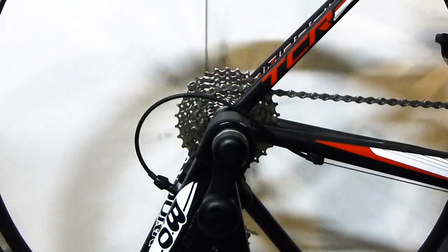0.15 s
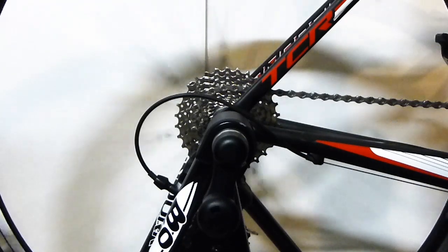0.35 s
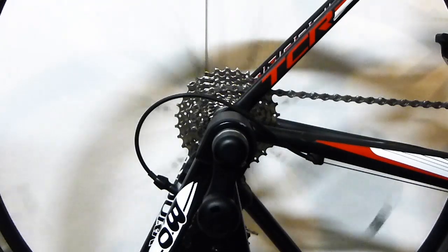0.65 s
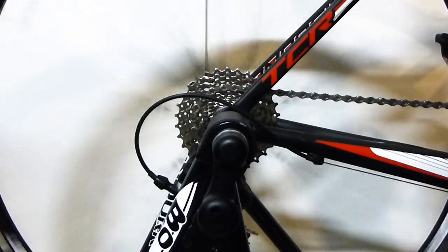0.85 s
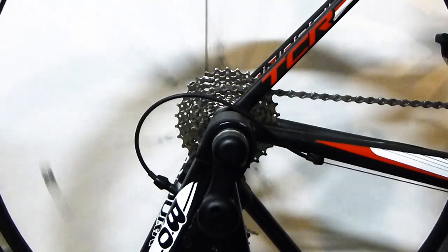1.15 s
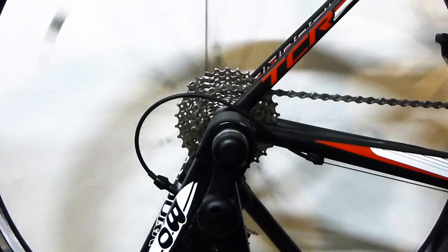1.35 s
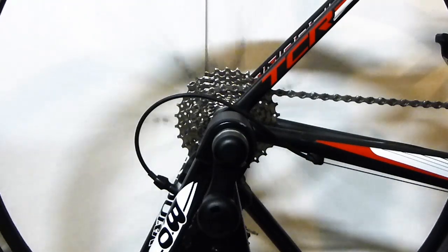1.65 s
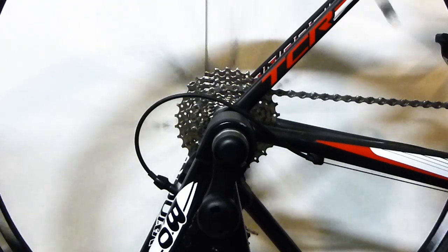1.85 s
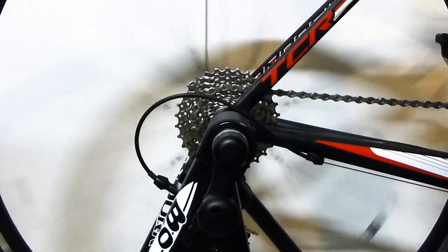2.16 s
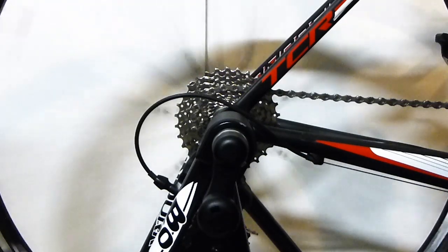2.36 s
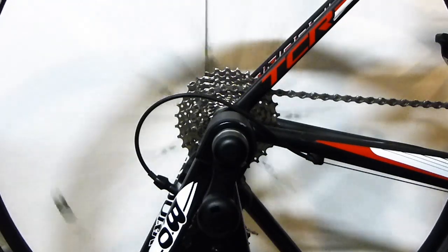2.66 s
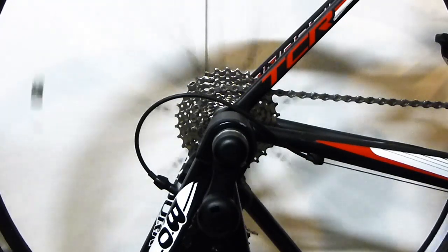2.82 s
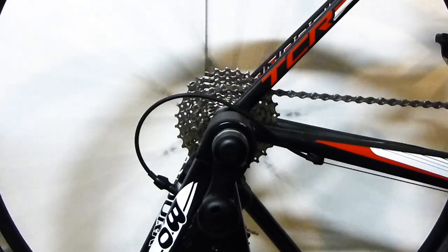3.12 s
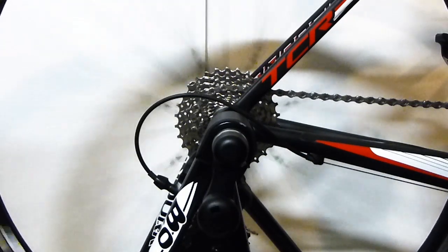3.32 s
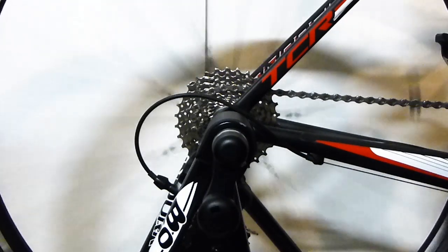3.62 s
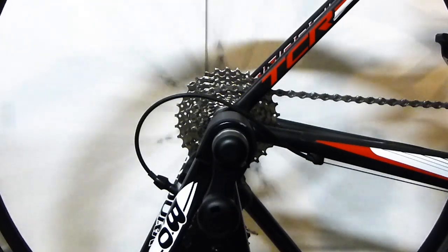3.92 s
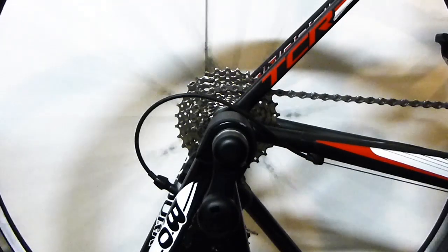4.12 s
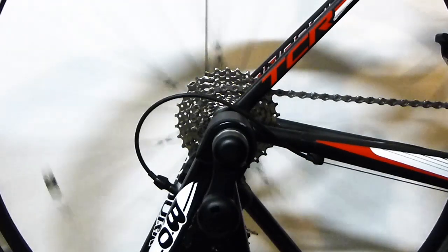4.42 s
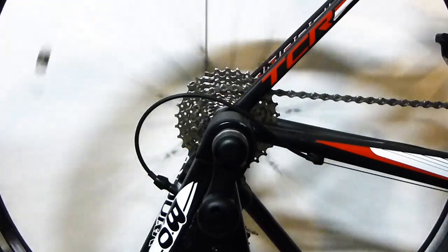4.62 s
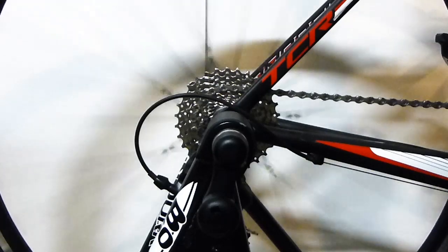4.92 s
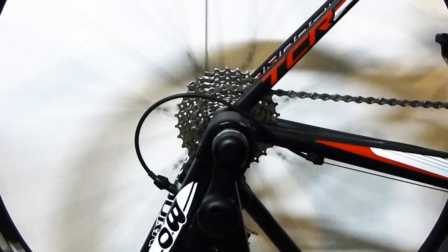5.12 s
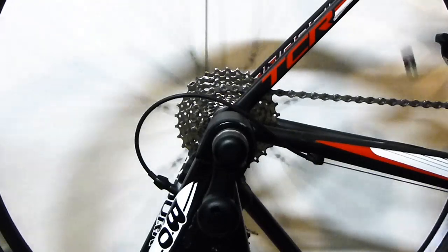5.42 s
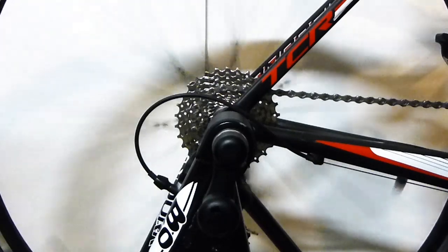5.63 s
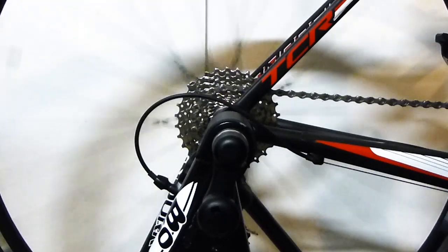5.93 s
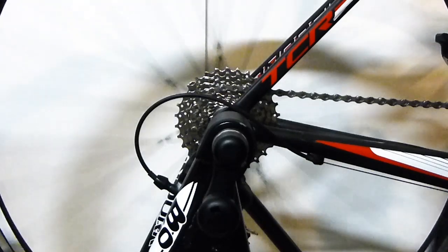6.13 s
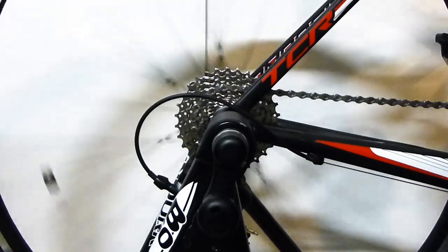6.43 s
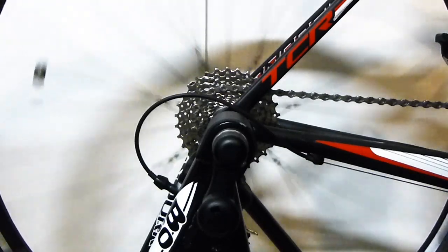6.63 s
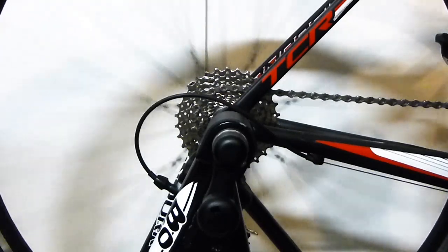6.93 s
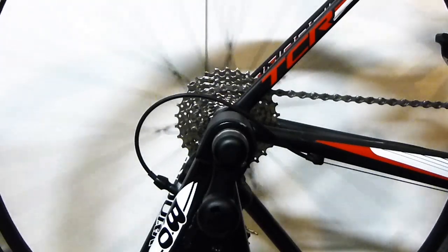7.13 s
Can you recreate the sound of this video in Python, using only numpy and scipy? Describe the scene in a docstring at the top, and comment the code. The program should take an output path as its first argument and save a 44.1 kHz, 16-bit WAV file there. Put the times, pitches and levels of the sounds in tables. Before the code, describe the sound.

Close and dry-ish in a small room: the ratchet of a freewheeling bike wheel clicks continuously, fast then gradually slower, never quite stopping. Ticks vary slightly in strength and colour in a pattern repeating each turn, with thin high ringing from the sprockets and faint thumps in the frame. Soft friction brushes periodically underneath, with steady low-level hiss and a barely audible drone.

```python
"""Bright metallic ticks slow down, each with a short knock and a singing tail, over a soft rub and room hiss.
A bicycle's rear wheel coasts on a stand in a small room: freehub pawls drop over one ratchet tooth after another.
Shaped noise bursts ring the hub modes, single kicks ring the sprockets, and each tick excites a diffuse room tail.
The rub is noise through the wheel's low resonances, swelling once a turn; hiss and drone are filtered noise."""
import sys
import numpy as np
from scipy import signal
from scipy.fft import rfft, irfft
from scipy.io import wavfile
from scipy.ndimage import uniform_filter1d

SR = 44100
rng = np.random.default_rng(int(sys.argv[2]) if len(sys.argv) > 2 else 0)


def generate_wav(signal):
    """Clip the signal to [-1, 1] and save it as 16-bit WAV at the path in sys.argv[1]."""
    frames = np.transpose(np.atleast_2d(signal))
    scaled = np.clip(frames, -1, 1) * 32767
    pcm = np.round(scaled).astype(np.int16)
    wavfile.write(sys.argv[1], SR, pcm)


N = 320607
TEETH = 15  # pawl drops per turn of the wheel
SIZE, LEAD_IN = 16384, 400  # samples in one tick with its tail, and samples ahead of the drop

# left-right likeness of the steady noises and the room tail: [f/Hz, likeness 0-1]
NOISE_LIKENESS = [(30, 0.7), (70, 1), (150, 0.85), (400, 0.28), (1000, 0), (6000, 0.69), (14000, 0.8)]
# the rubbing spot, turn by turn: [friction swell/dB, half-width to 1/e in teeth, narrow-tone level/dB]
RUB_SWELLS = [(5, 0.81, -54), (4, 1.55, -53), (3, 1.2, -64), (3, 0.71, -57)]


def from_db(db):
    """Decibels to gain."""
    return 10 ** (np.asarray(db) / 20)


def rms_one(x):
    """Scales to rms 1."""
    return x / np.sqrt(np.mean(np.abs(x) ** 2) + 1e-20)


def bins(size):
    """Frequencies of a spectrum (Hz), kept at 1 Hz or above for the log axis."""
    return np.maximum(np.arange(size // 2 + 1) * SR / size, 1)


def at_hz(points, hz):
    """Reads a table on a log-frequency axis."""
    points_hz, values = np.array(points).T
    return np.interp(np.log(hz), np.log(points_hz), values)


def resonances(modes, hz):
    """Response of parallel damped modes with alternating signs."""
    response = 0
    for k, (centre, width, db) in enumerate(modes):
        mode = from_db(db) / (1 + 1j * (hz ** 2 - centre ** 2) / (hz * width))
        response = response + (-1) ** k * mode
    return response


def stereo(pair, likeness, hz):
    """Two unrelated spectra become left and right with a given likeness."""
    alike = np.clip(at_hz(likeness, hz), 0, .99)
    mid = np.sqrt((1 + alike) / 2) * pair[0]
    side = np.sqrt((1 - alike) / 2) * pair[1]
    return np.array([mid + side, mid - side])


def noise(response):
    """Stereo noise through a frequency response; rms 1."""
    hz = bins(N)
    white = rfft(rng.standard_normal((2, N)))
    return rms_one(irfft(stereo(white, NOISE_LIKENESS, hz) * response(hz), N))


def decay(t, tau):
    """Exponential fade from time zero."""
    return (t >= 0) * np.exp(-np.maximum(t, 0) / tau)


def turn_swing(tooth, peak_tooth, per_turn=1):
    """Cosine that follows the wheel's turning, highest at the peak tooth."""
    return np.cos(2 * np.pi * per_turn * (tooth - peak_tooth) / TEETH)


def air(level_db=-53, drone_db=-69):
    """Room tone and hiss are shaped noise; two narrow resonances add a faint low drone."""
    # spectrum of the air: [f/Hz, relative level per Hz/dB]
    air_colour = [(20, 4), (45, 5.5), (130, -1), (260, 4), (400, 2), (650, 0), (1000, -11), (2000, -9.5),
                  (3000, -12), (6000, -10.5), (10000, -7), (14000, -67.5), (16000, -77)]
    drone_modes = [(202.3, 11, -0.065), (244.6, 5.5, -2.0)]  # [f/Hz, width/Hz, level/dB]
    drone = noise(lambda hz: resonances(drone_modes, hz))
    hiss = noise(lambda hz: from_db(at_hz(air_colour, hz)))
    return from_db(level_db) * hiss + from_db(drone_db) * drone


def room(level_db=1.5, build_s=0.0031):
    """Diffuse echoes build up and die at a rate set by frequency; one tail per tooth of the turn."""
    # colour of the room's answer to a tick: [f/Hz, relative level/dB]
    room_colour = [(200, 13), (800, 0), (2000, -8), (3200, -2), (5000, -6), (8000, -12.5), (11000, -13),
                   (13500, -15.5), (14500, -13.5), (16000, -29)]
    # how long the room rings: [f/Hz, t60/s]
    room_t60 = [(200, 0.26), (2000, 0.36), (6000, 0.26), (10000, 0.23), (15000, 0.25)]
    t, hz = np.arange(SIZE) / SR, bins(SIZE)
    white = stereo(rfft(rng.standard_normal((2, TEETH, SIZE))), NOISE_LIKENESS, hz)
    coloured = white * from_db(at_hz(room_colour, hz))
    build_up = 1 - np.exp(-(t / build_s) ** 2)
    edges, tail = [100, 1200, 3000, 6000, 9000, 12000, 18000], 0  # band edges (Hz)
    for low, high in zip(edges, edges[1:]):
        t60 = at_hz(room_t60, np.sqrt(low * high))
        envelope = np.exp(-np.log(1000) * t / t60) * build_up
        band = irfft(coloured * (hz >= low) * (hz < high))
        tail = tail + band * envelope / np.linalg.norm(envelope)
    return from_db(level_db) * rfft(tail)[:, coast()[0] % TEETH]


def coast(count=64):
    """Friction and air drag take squared speed per tooth: tooth number, drop time (s), halvings of speed."""
    start_s, start_rate = -.11555, 11.1046  # one tooth before tooth zero; teeth/s before imbalance
    friction, drag = 1.00237, .0034159  # squared rate lost per tooth: steady (1/s^2), and as a share
    imbalance, heavy_tooth = 3.552, 11.5  # heavy side: swing of squared rate (1/s^2), tooth where it is lowest
    tooth = np.arange(count)
    energy = (start_rate ** 2 + friction / drag) * np.exp(-drag * tooth) - friction / drag
    rate = np.sqrt(energy + imbalance * turn_swing(tooth, heavy_tooth))
    return tooth, start_s + np.cumsum(1 / rate), np.log2(start_rate / rate)


def spot_contact(tooth, rub_tooth=9.5):
    """How closely the rubbing spot touches (0-1), a bell curve around its tooth; one row per turn."""
    rows = []
    for turn, (_, width, _) in enumerate(RUB_SWELLS):
        rows.append(np.exp(-((tooth - rub_tooth - turn * TEETH) / width) ** 2))
    return np.array(rows)


def rub_levels(level_db=-54.5, db_per_halving=-0.5, sway_db=1, sway_tooth=7.6):
    """Friction level at each tooth (dB): it fades with speed, sways twice a turn and swells once a turn."""
    tooth, _, halvings = coast()
    sway = sway_db * turn_swing(tooth, sway_tooth, per_turn=2)
    swell = np.array(RUB_SWELLS)[:, 0] @ spot_contact(tooth)
    return level_db + db_per_halving * halvings + sway + swell


def rubbing():
    """Friction noise through the wheel's low resonances; at the spot, narrow tones grow out of it."""
    # broad resonances that the friction sounds through: [f/Hz, width/Hz, relative level/dB]
    friction_modes = [(767, 56, -3), (936, 69, 3.5), (925, 127, 2.5), (1180, 280, -7.5), (1451, 230, -0.5),
                      (1680, 1200, -8)]
    # narrow tones that the spot draws from the wheel: [f/Hz, width/Hz, relative level/dB]
    tone_modes = [(770, 64, -3), (913, 20, 9), (980, 24, 6), (1500, 14, 0)]
    t, (tooth, seconds, _) = np.arange(N) / SR, coast()
    friction_gain = from_db(np.interp(t, seconds, rub_levels()))
    friction = friction_gain * noise(lambda hz: resonances(friction_modes, hz))
    tone_gain = from_db(np.array(RUB_SWELLS)[:, 2]) @ spot_contact(tooth)
    tones = np.interp(t, seconds, tone_gain) * noise(lambda hz: resonances(tone_modes, hz))
    return friction + tones


def frame_thump(level_db=-56, pitch_hz=115, fade_s=0.019, uneven_db=2.0, sway_db=3, peak_tooth=2.1):
    """Each drop nudges the frame on its stand: a decaying low sine of uneven pitch, strongest twice a turn."""
    t, tooth = (np.arange(SIZE) - LEAD_IN) / SR, coast()[0][:, None]
    chance = rng.standard_normal((len(tooth), 2))
    db = level_db + uneven_db * chance[:, :1] + sway_db * turn_swing(tooth, peak_tooth, per_turn=2)
    pitch = pitch_hz * (1 + 0.306 * chance[:, 1:])
    thump = from_db(db) * decay(t, fade_s) * np.sin(2 * np.pi * pitch * t)
    return np.array([thump, thump])


def drops(thin_from_s=5.57, thin_takes_s=0.95, thin_ring_db=-7):
    """The ratchet repeats every turn; per drop: time (s), strength (dB), seating, ring (dB), thinness (0-1)."""
    # the ratchet, tooth by tooth: [strength/dB, seating from -1 glancing to 1 square, sprocket ring/dB]
    ratchet = [(-0.04, 0.33, .5), (0.07, 0.7, -22), (1.3, 0.32, -2), (0.7, -0.0082, 4), (-0.6, -0.11, 0),
               (0.5, 0.21, -20), (0.1, 0.61, -1.5), (-0.2, 0.88, .6), (-1.2, -0.4, 1.5), (-1, -0.52, -22),
               (0.16, 0.0091, -.5), (-0.05, -0.12, 2.5), (-0.43, 0.04, -3), (-1.4, -0.55, -19),
               (-0.55, 0.23, 4)]
    # drops that land differently: [tooth, extra strength/dB, extra seating]
    odd_drops = [(3, 1.5, 0), (4, 2.5, 0), (5, 2, -.2), (38, -1, -.5), (45, -1.5, .6), (46, -1, .5),
                 (48, 2, -.3), (49, 3.5, -.5), (55, 2, 0), (56, 1.5, 0), (57, 2, -.3)]
    tooth, seconds, _ = coast()
    db, seating, ring_db = np.array(ratchet)[tooth % TEETH].T
    for which, extra_db, extra_seating in odd_drops:
        db = db + extra_db * (tooth == which)
        seating = seating + extra_seating * (tooth == which)
    thin = np.clip((seconds - thin_from_s) / thin_takes_s, 0, 1)
    return seconds, db, seating, ring_db + thin_ring_db * thin, thin


def sprockets(ring_db=-46, uneven_db=3.0, spread_db=5, thin_db=-4):
    """Lightly damped steel sings on: every drop kicks each mode with its own strength and left-right balance."""
    # sprockets and spokes, ringing on: [f/Hz, relative level/dB, t60/s]
    long_modes = [(759, -19, .2), (909, -16, .25), (1491, -12, .35), (4877, -18, .2), (7423, -4, .8),
                  (8365, -5.5, .55), (8554, 0, .28), (9027, -9, .28), (10109, -8, .3), (10179, -12, .28),
                  (10831, -2, .33), (11035, -8, .2), (11224, -2, .27), (11859, -5, .15), (12575, 0, .24),
                  (13022, -9, .26), (13495, -5, .26), (13985, -8, .33), (14368, -6, .22), (14800, -3, .2)]
    seconds, drop_db, _, catch_db, thin = drops()
    at, out = np.maximum(seconds * SR, 0).astype(int), np.zeros((2, N))
    for hz, db, t60 in long_modes:
        chance = rng.standard_normal((len(at), 2))
        # the longest modes depend on how the tooth catches the sprockets, the others on the drop's strength
        tooth_db = catch_db if t60 > .5 else drop_db + thin_db * thin + uneven_db * chance[:, 0]
        balance_db = spread_db * chance[:, 1] * np.array([[.5], [-.5]])
        kicks = np.full((2, N), 1e-18)  # tiny floor keeps the filter out of denormals
        kicks[:, at] = from_db(ring_db + db + tooth_db + balance_db)
        radius, angle = from_db(-60 / (t60 * SR)), 2 * np.pi * hz / SR
        out += signal.lfilter([0, np.sin(angle)], [1, -2 * radius * np.cos(angle), radius ** 2], kicks)
    return out


def burst(envelope):
    """Random grain under an envelope, one pair per drop; so hard a contact feeds all bands evenly."""
    grain = rfft(rng.standard_normal((2, len(coast()[0]), envelope.shape[-1])) * envelope)
    return irfft(grain / np.sqrt(uniform_filter1d(np.abs(grain) ** 2, size=40, axis=-1)))


def pawl_forces(chatter_s, scatter_db, scatter_s, early_db, second_db=-2.5, early_swing_db=6.5, compact=0.92):
    """Steel chatters on steel; an off-centre ratchet makes the early slip strongest once a turn."""
    t = (np.arange(SIZE // 8) - LEAD_IN) / SR
    off_centre = turn_swing(coast()[0][:, None], 10.5)
    lead_s, lag_s = .0028 + .0018 * off_centre, .0009 + .0004 * off_centre
    slip_ramp = np.clip(1 + t / lead_s, 0, 1) * (t < 0)
    early = from_db(early_db + early_swing_db * off_centre) * burst(slip_ramp)
    main = burst(decay(t, chatter_s))
    second = from_db(second_db) * burst(decay(t - lag_s, chatter_s))
    # waves coming back from spokes and frame; a hard drop is more compact
    scatter = from_db(scatter_db - compact * drops()[1][:, None]) * burst(decay(t, scatter_s))
    force = early + main + second + scatter
    return rfft(force / np.linalg.norm(force, axis=-1, keepdims=True), SIZE)


def hub_modes(hz, uneven_db=2):
    """Heavily damped modes, each struck with a strength of its own; one response per drop."""
    # hub shell and freehub body: [f/Hz, width/Hz, relative level/dB]
    body_modes = [(779, 357, -4.6), (1118, 200, -1.7), (1468, 180, 0.3), (1813, 86, 9.0), (1983, 160, 7.0),
                  (2275, 370, 1.3), (3087, 392, -2.0), (4049, 290, 3.7), (4792, 210, 7.2), (5298, 718, 0.8),
                  (6592, 211, 6.7), (6904, 147, 11.9), (7356, 479, 10.2), (7932, 283, 11.9),
                  (8626, 231, 12.6), (8900, 150, 16.4), (9347, 523, 12.7), (9875, 148, 18.1),
                  (10213, 310, 12.0), (10659, 152, 16.5), (11079, 229, 16.7), (11851, 224, 12.1),
                  (12208, 159, 15.6), (12620, 193, 13.0), (13007, 176, 20.4), (13482, 218, 21.1),
                  (14381, 114, 18.3), (14786, 148, 14.5), (15340, 413, 7.9)]
    shapes = np.array([(-1) ** k * resonances([mode], hz) for k, mode in enumerate(body_modes)])
    strengths = from_db(uneven_db * rng.standard_normal((len(coast()[0]), len(body_modes))))
    return rms_one(strengths @ shapes)


def hub(strength_db=8.5, thud_db=-28, thud_hz=500, split_hz=5500, rub_coupling=1.0):
    """Pawl forces ring the hub; tooth and speed set strength and colour. One stereo spectrum per tick."""
    # left-right likeness of the ticks: [f/Hz, likeness 0-1]
    click_likeness = [(500, 0.033), (1900, 0.71), (4500, 0.66), (7500, 0.94), (10000, 0.78), (13200, 0.51),
                      (15000, 0.79)]
    # tick colour: [f/Hz, per unit of square seating/dB, per halving of speed/dB, for the last, thinner ticks/dB]
    tick_colour = [(1080, 0.5, -6, 3.5), (1700, 6.5, -0.1, -10), (2380, 2, 0.5, -3.5),
                   (3300, 4, -3.3, -0.9), (4430, 4, -6, 6.5), (4070, 0.5, -1, 0), (4460, 1, -12.5, 15),
                   (5420, 5, -4, 4.5), (6240, 3, -4.5, 7.5), (7200, 5.5, -4, -10), (7900, 5.5, -2, 2.5),
                   (9000, -0.2, -0.6, 1.5), (11450, -1.9, -1.2, 0.5), (13200, -2.5, 7.5, -3),
                   (13400, -5, -6, 3), (14900, -0.5, -4, 2)]
    hz = bins(SIZE)
    body = hub_modes(hz) + from_db(thud_db) / (1 + 1j * hz / thud_hz)
    # the treble leaves the hub at once; lower waves rattle about in the frame for longer
    treble = 1 / (1 + (split_hz / hz) ** 8)
    sharp = pawl_forces(chatter_s=0.00071, scatter_db=0.5, scatter_s=0.0068, early_db=-10.5)
    blunt = pawl_forces(chatter_s=0.001, scatter_db=9.5, scatter_s=0.0078, early_db=-3.5)
    forces = stereo(np.sqrt(treble) * sharp + np.sqrt(1 - treble) * blunt, click_likeness, hz)
    _, db, seating, _, thin = drops()
    centres_hz, *changes_db = np.transpose(tick_colour)
    colours = db[:, None] + np.transpose([seating, coast()[2], thin]) @ changes_db
    # a rubbing wheel passes on more of the low knock
    rub_db = rub_levels()
    colours[:, 0] += rub_coupling * (rub_db - rub_db.mean())
    gains = from_db([np.interp(hz, centres_hz, colour) for colour in colours])
    return from_db(strength_db) * forces * body * gains


def at_clicks(sounds):
    """Lays one stereo sound on every pawl drop."""
    out = np.zeros((2, N + 3 * SIZE))  # margins hold ticks that overlap either end
    for k, seconds in enumerate(coast()[1]):
        start = SIZE + round(seconds * SR) - LEAD_IN
        out[:, start:start + SIZE] += sounds[:, k]
    return out[:, SIZE:SIZE + N]


def scene():
    """Ticks, ringing and rubbing share the wheel's place, its treble a little left; the room hisses below."""
    # stereo place of the wheel: [f/Hz, left minus right/dB]
    wheel_pan = [(200, 0.5), (600, -3.5), (1300, -0.8), (2500, -.3), (5000, 1), (9000, 0.7), (14000, 0.9)]
    ticks = at_clicks(irfft(hub() * (1 + room())) + frame_thump())
    wheel = ticks + sprockets() + rubbing()
    pan = from_db(at_hz(wheel_pan, bins(N)) * np.array([[.5], [-.5]]))
    return irfft(rfft(wheel) * pan, N) + air()


def record(dry, cutoff_hz=15900, offset=-.012):
    """The recorder cuts the top with a steep low-pass and sits slightly off zero."""
    top_cut = signal.ellip(10, .2, 80, cutoff_hz, fs=SR, output="sos")
    return signal.sosfilt(top_cut, dry) + offset


dry = scene()
out = record(dry)
generate_wav(out)
```